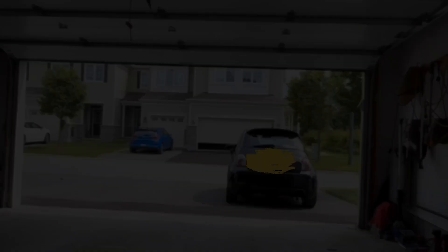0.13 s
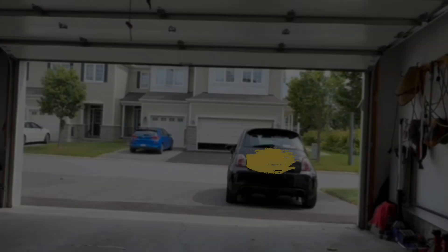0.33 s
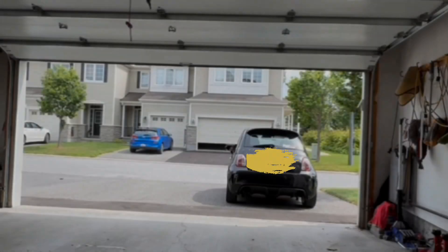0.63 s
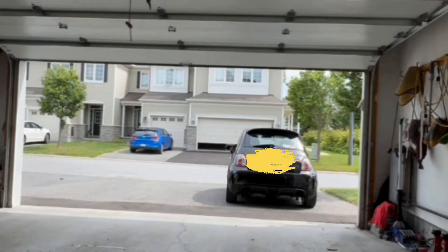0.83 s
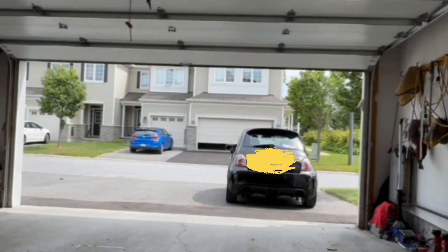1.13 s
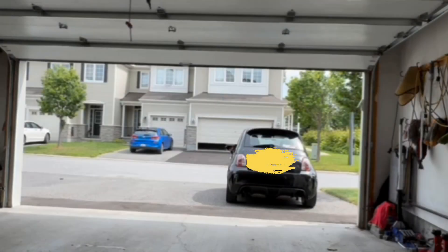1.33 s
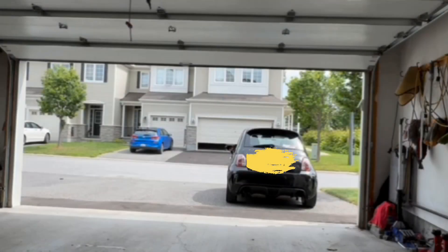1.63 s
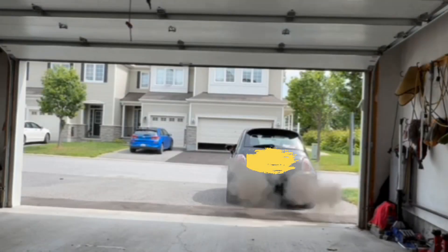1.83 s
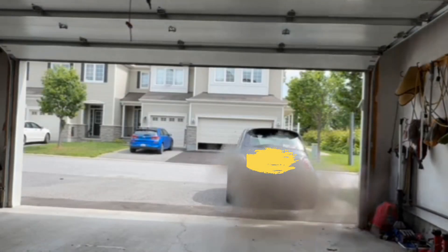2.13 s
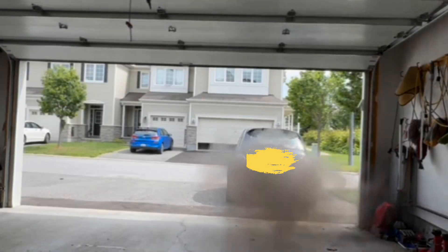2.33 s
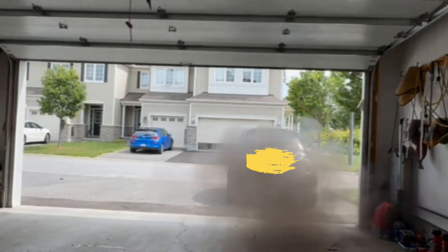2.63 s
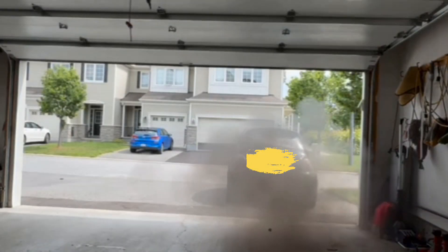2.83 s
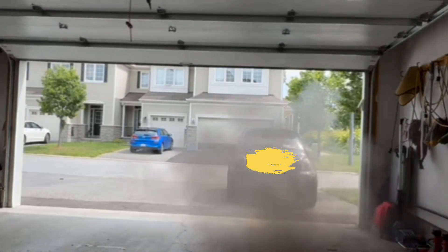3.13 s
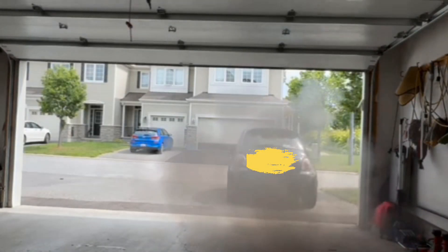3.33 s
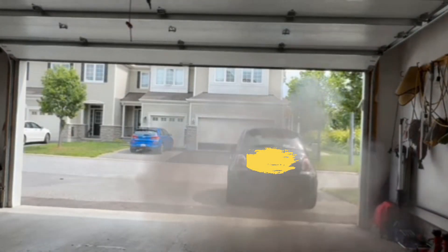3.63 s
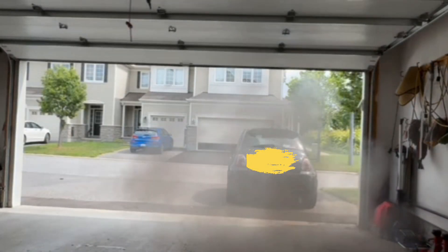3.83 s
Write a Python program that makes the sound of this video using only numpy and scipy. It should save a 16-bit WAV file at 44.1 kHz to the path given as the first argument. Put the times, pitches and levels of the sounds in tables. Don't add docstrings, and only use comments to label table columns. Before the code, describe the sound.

Car engine and exhaust on a driveway: low idle, sharp rising rev, seven explosive backfires with booming street echoes, then a falling low hum. Stereo microphones sit behind it in the garage, loud peaks flattened.

```python
import sys
import numpy as np
from scipy import signal
from scipy.fft import rfft, irfft, next_fast_len
from scipy.io import wavfile
from scipy.ndimage import map_coordinates

SR = 44100
rng = np.random.default_rng(int(sys.argv[2]) if len(sys.argv) > 2 else 0)


def rack_gain(trim_db):
    fader = np.asarray(trim_db, float)
    return 10 ** (fader / 20)


def generate_wav(sig):
    pcm = np.round(np.clip(np.atleast_2d(sig).T, -1, 1) * 32767).astype(np.int16)
    wavfile.write(sys.argv[1], SR, pcm)


N = 176400
T = np.arange(N) / SR

# time in seconds, firing rate in Hz, exhaust pulse in dB, throttle in dB.
DRIVE = [(.05, 28.33, -14.5, -47.5), (.25, 29.05, -12.5, -48), (1.06, 29.51, -15, -48.5),
         (1.1, 35, -9.5, -34), (1.18, 45.16, -8, -29), (1.26, 59.61, -8.5, -26.5), (1.352, 79.54, -8, -25),
         (1.456, 102.3, -8.5, -22.5), (1.588, 126.9, -7, -20.5), (1.644, 133.3, -9.5, -18),
         (1.673, 135.9, -38, -28.5), (2.45, 138.4, -30.5, -38), (2.56, 132.4, -48, -41),
         (2.749, 121, -42.5, -61.5), (2.999, 105.9, -47.5, -64), (3.26, 94.5, -41.5, -79),
         (3.8, 69.2, -46, -92.5), (4.0, 60.4, -41, -75)]
CYLINDER_LEVELS = [.3, 0, -.3, .05]
# pitch in Hz, width in Hz, level in dB.
PIPE_BOOM = [(59.84, 4.3, 6), (77, 3.6, -11.5), (88.15, 7.9, 2), (98.1, 7.8, -3), (127.8, 11, -7.5),
             (161.4, 19, -11), (203.7, 14, -8), (234, 11, -14), (262.5, 8, -17), (328.2, 16, -13),
             (430, 67, -13.5), (510, 25, -17.5)]
# frequency in Hz, level in dB per Hz.
RASP_TONE = [(120, -21), (250, -4), (500, 0), (700, 0), (1000, -4.5), (1300, -16.5), (2000, -27.5),
             (4000, -46.5)]
# pitch in Hz, width in Hz, level in dB.
RASP_NOTES = [(335.4, 8.4, 13), (420.3, 32, 7), (500.3, 24, 11), (613.3, 18, 12), (671, 12, 6),
              (772.4, 22, 6), (938, 17, 6.5), (1039, 30, 5)]
# time in seconds, peak in dB.
FIRST_BARKS = [
    (1.071, -34),
    (1.100, -26.5),
    (1.124, -27.5),
    (1.152, -23),
]
# time in seconds, peak in dB.
VALVE_TICKS = [
    (1.071, -57.5),
    (1.101, -47.5),
    (1.152, -56.5),
]
# frequency in Hz, level in dB per Hz.
HISS_TONE = [(900, -14), (1500, -1.5), (2600, -6.5), (4200, -12.5), (6000, -13.5), (8500, -13.5),
             (9500, -14), (11300, -16), (12200, -38), (16000, -37)]
WHINE_PITCHES = [9520, 9680]
# time in seconds, peak in dB, crack in dB, far wall thump in dB.
SHOTS = [
    (1.73, -7, 1, -13),
    (1.857, -5, 0.5, -5),
    (1.982, -5, -1, 1),
    (2.102, -6.5, 1, 3.5),
    (2.221, -6, 0, 4),
    (2.304, -6.5, -1.5, -9),
    (2.391, -6, -4, -11.5),
]
# delay in seconds, pitch in Hz, time to fall 60 dB in seconds, level in dB.
WALL_RINGS = [(0.014, 860, 0.047, -12), (0, 540, 0.031, 3.5), (.004, 660, 0.032, -1.5),
              (.014, 1060, 0.037, 0.5), (.023, 650, .05, -4), (0.011, 333.6, 0.034, -8),
              (0.023, 93.3, 0.11, -12), (.034, 430, 0.081, -10.5), (0.028, 170, 0.034, -7.5),
              (.052, 960, .06, -18)]
# frequency in Hz, level in dB per Hz.
BLAST_TONE = [(40, -40), (90, -9), (200, -3.5), (500, -6), (1060, -1.5), (1500, -7), (3000, -13.5),
              (7500, -16.5), (8600, -19.5), (10000, -16), (11800, -24), (16000, -31.5)]
# pitch in Hz, width in Hz, level over the blast in dB.
BLAST_NOTES = [(215, 12, 3), (543, 160, 4), (666.3, 360, 5.5), (1040, 59, 3)]
# time in seconds, pitch in Hz, time to fall 60 dB in seconds, rise in seconds, level in dB.
LONE_THUDS = [
    (1.655, 63, .35, .025, -11),
    (1.7195, 430, .07, .002, -7),
    (1.7205, 245, .07, .002, -7),
    (1.7205, 515, .06, .002, -6),
    (2.405, 58, .3, .025, -20),
]
# frequency in Hz, time to fall 60 dB in seconds.
STREET_DECAY = [(55, 0.67), (110, 0.25), (300, 0.21), (700, 0.5), (1800, 0.71), (5000, 0.62), (12800, 0.38)]
# frequency in Hz, level in dB per Hz.
QUIET_TONE = [(35, -14.5), (55, 5), (150, -3.5), (400, 2), (700, -5), (1100, -15.5), (3000, -31),
              (15000, -57.5)]
# pitch in Hz, width in Hz, level in dB.
FAR_MACHINES = [(1270, 45, -84), (1500, 30, -88), (1000, 40, -88)]
# frequency in Hz, likeness from 0 to 1.
LIKENESS = [(60, .95), (200, .8), (500, .5), (1000, .4), (3000, .45), (8000, .5), (15000, .1)]
# frequency in Hz, left minus right in dB.
LEFT_LOUDER = [(60, 1.3), (300, 1), (1000, 3), (4000, 3.5), (8000, 1.5), (13000, -.4)]
# frequency in Hz, lead in radians.
LEFT_AHEAD = [(60, 0), (150, .0), (350, 0.3), (600, 1.3), (1500, 0.9), (3000, 1.3), (6000, 1.9),
              (10000, 1.5)]


def unit(x):
    return x / np.sqrt(np.mean(x ** 2) + 1e-20)


def along(points, hz):
    f, v = np.transpose(points)
    return np.interp(np.log(hz + 1), np.log(f + 1), v)


def filtered(x, response):
    m = next_fast_len(N + SR // 2)
    return irfft(rfft(x, m) * response(np.fft.rfftfreq(m, 1 / SR)), m)[..., :N]


def toned(x, tone):
    return filtered(x, lambda f: rack_gain(along(tone, f)))


def resonances(rows, f, sign):
    total = 0
    for k, (hz, width, db) in enumerate(rows):
        total = total + sign ** k * rack_gain(db) * 1j * f * width / (hz * hz - f * f + 1j * f * width)
    return total


def wobble(rate):
    return map_coordinates(rng.standard_normal(int(N * rate / SR) + 4), [T * rate])


def pair():
    def blend(hz):
        turn = np.arccos(np.clip(along(LIKENESS, hz), -1, 1)) / 2
        return np.array([np.cos(turn), np.sin(turn)])
    mid, side = filtered(rng.standard_normal((2, N)), blend)
    return np.array([mid + side, mid - side])


def whistling_air(hz, width_hz):
    return unit(filtered(pair(), lambda f: resonances([(hz, width_hz, 0)], f, 1) ** 2))


def burst(rows, hz, width_hz, t60):
    shape = sum((T > s) * rack_gain(db - 60 * np.abs(T - s) / t60) for s, db in rows)
    return shape * whistling_air(hz, width_hz)


def answered(x, t60_of):
    hz, t, z = signal.stft(pair()[:, :SR], SR, nperseg=256)
    tail = signal.istft(z * rack_gain(-60 * t / t60_of(hz)[:, None]), SR, nperseg=256)[1]
    return signal.fftconvolve(x, tail / np.linalg.norm(tail[0]), axes=1)[:, :N]


def exhaust_boom(phase, rate, pulse_db, throttle_db, load, sizes):
    low_hz = 48

    def pipe(f):
        return resonances(PIPE_BOOM, f, 0.95) * f ** 4 / (low_hz ** 4 + f ** 4)

    fall = np.interp(throttle_db, [-62, -48, -22], [1.6, 1, 0.7])
    late, smear = .5, .4
    pulse = 0
    for k in range(1, 13):
        start = np.angle(pipe(k * rate[0]))
        if k > 3:
            start += 2 * np.pi * late * k + smear * (k - 7) ** 2
        waver_db = (k > 1) * .6 * load * wobble(6.5)
        pulse = pulse + k ** -fall * rack_gain(waver_db) * np.cos(k * phase - start)
    return filtered(pulse * sizes * rack_gain(pulse_db + 7.0), pipe)


def tailpipe_rasp(phase, throttle_db, load, sizes):
    puffs = np.exp((0.2 + 0.17 * (load - 1)) * np.cos(phase))
    puffs = puffs * rack_gain(4 / load * np.cos(phase / 4 - 0.49))
    buzz = sum(np.cos(k * phase + rng.uniform(0, 2 * np.pi)) for k in range(2, 30))
    clean_db, clean_grows = -3, 0.4
    rasp = unit(puffs * pair()) + rack_gain(clean_db + clean_grows * (throttle_db + 14.5)) * unit(buzz * sizes)
    rasp = rasp / np.hypot(1, rack_gain(clean_db + clean_grows * (throttle_db + 20)))

    def tone(f):
        return rack_gain(along(RASP_TONE, f)) * (1 + resonances(RASP_NOTES, f, 1))

    return unit(filtered(rasp, tone)) * rack_gain(throttle_db + 1.3 * wobble(14))


def valve_and_intake_hiss(phase, throttle_db):
    level_db = -65 + 0.73 * (throttle_db + 49.5)
    level_db += 0.27 * np.clip(throttle_db + 51.5, -99, 0)
    beat = np.cos(phase / 4 + 1.3) + 0.81 * np.cos(phase / 2 + .4) + 0.34 * wobble(40)
    return unit(toned(rack_gain(-0.5 * beat) * pair(), HISS_TONE)) * rack_gain(level_db + 1.5 * wobble(8.9))


def idle_whine(rate):
    tones = sum(np.sin(2 * np.pi * hz * T) for hz in WHINE_PITCHES)
    return tones * rack_gain(-82 + 2.7 * wobble(15)) * (rate < 32)


def turbo_whistle(rate, throttle_db, load):
    spin = np.cumsum(8800 + 11.5 * rate + 300 * wobble(1500)) / SR
    level_db = -40.5 + 0.65 * throttle_db + 4 * wobble(25)
    return np.sin(2 * np.pi * spin) * rack_gain(level_db) * (load > 1)


def intake_gulp():
    middle_s, length_s = 1.03, 0.05
    return whistling_air(1270, 150) * rack_gain(-51) * np.exp(-((T - middle_s) / length_s) ** 2)


def engine():
    s, *columns = np.transpose(DRIVE)
    rate, pulse_db, throttle_db = [np.interp(T, s, c) for c in columns]
    load = 1 + 4.5 * np.clip((throttle_db + 45) / 22, 0, 1)
    first_firing, jitter = .37, .004
    cycles = np.cumsum(rate) / SR + first_firing + jitter * load * wobble(60)
    phase = 2 * np.pi * cycles
    firing = np.arange(500)
    size_db = np.take(CYLINDER_LEVELS, firing % 4) + 0.2 * rng.standard_normal(500)
    sizes = rack_gain(load * np.interp(cycles + .5, firing + .5, size_db))

    boom = exhaust_boom(phase, rate, pulse_db, throttle_db, load, sizes)
    near = tailpipe_rasp(phase, throttle_db, load, sizes)
    near = near + burst(FIRST_BARKS, 684, 350, .07) + burst(VALVE_TICKS, 9500, 2500, .03)
    near = near + valve_and_intake_hiss(phase, throttle_db) + idle_whine(rate)
    near = near + turbo_whistle(rate, throttle_db, load) + intake_gulp()
    garage = answered(near + rack_gain(-11) * boom, lambda hz: 0.73 + 0 * hz)
    return boom + near + rack_gain(2) * garage


def decaying_note(hz, t60, rise_s):
    t = np.arange(SR // 4) / SR
    return np.sin(2 * np.pi * hz * t) * rack_gain(-60 * t / t60) * (1 - np.exp(-t / rise_s))


def add_note(track, s, note):
    track[round(s * SR):][:len(note)] += note


def bang_rings():
    rings = np.zeros(N)
    chance = rng.standard_normal((len(SHOTS), len(WALL_RINGS), 3))
    for (s, db, _, thump_db), rows in zip(SHOTS, chance):
        for (delay, hz, t60, level_db), (a, b, c) in zip(WALL_RINGS, rows):
            ring_db = db + level_db + (hz < 250) * thump_db + 1.5 * b
            ring = rack_gain(ring_db) * decaying_note(hz * (1 + .03 * a), t60, 0.0025)
            add_note(rings, s + delay + .0012 * c, ring)
        add_note(rings, s + .042, -rack_gain(db + thump_db + 8) * decaying_note(215, .024, .005))
    return rings * rack_gain(2.5)


def lone_thuds():
    thuds = np.zeros(N)
    for s, hz, t60, rise_s, db in LONE_THUDS:
        add_note(thuds, s, rack_gain(db) * decaying_note(hz, t60, rise_s))
    return thuds


def bang_blast():
    blast, crack = np.zeros(N), np.zeros(N)
    hold_s, release_t60_s, crack_t60_s = 0.049, .16, .045
    for s, db, crack_db, _ in SHOTS:
        after = T - s
        rise = np.clip(after / .003, 0, 1)
        blast += rise * rack_gain(db + crack_db - 60 * np.clip(after - hold_s, 0, 9) / release_t60_s)
        crack += rise * rack_gain(db + crack_db - 60 * np.abs(after) / crack_t60_s)

    def roar_tone(f):
        return rack_gain(along(BLAST_TONE, f)) * np.abs(1 + resonances(BLAST_NOTES, f, 0.61))

    def snap_tone(f):
        return rack_gain(along(BLAST_TONE, f) / 2) * f / (f + 2500)

    grain = rack_gain(-1.5 * wobble(300) + 0.5 * wobble(70))
    roar = unit(filtered(pair() * grain, roar_tone))
    snap = unit(filtered(pair(), snap_tone))
    return rack_gain(-11.5) * blast * roar + rack_gain(-22) * crack * snap


def bangs():
    near = bang_rings() + lone_thuds() + bang_blast() + burst([(1.7195, -22)], 4900, 3000, .045)
    return near + rack_gain(-3) * answered(near, lambda hz: along(STREET_DECAY, hz))


def quiet_street():
    quiet = rack_gain(-63.5) * unit(toned(pair(), QUIET_TONE))
    for hz, width_hz, db in FAR_MACHINES:
        quiet = quiet + rack_gain(db) * whistling_air(hz, width_hz)
    return quiet


def scene():
    def microphones(f):
        halves = [.5, -.5]
        return rack_gain(np.outer(halves, along(LEFT_LOUDER, f))) * np.exp(1j * np.outer(halves, along(LEFT_AHEAD, f)))
    return filtered(engine() + bangs() + quiet_street(), microphones)


def roll_off(x):
    return signal.sosfilt(signal.butter(12, 16400, fs=SR, output="sos"), x)


def record(dry):
    lead_in_s, start_s = .037, .0595
    x = dry * np.clip((T - start_s) / .00003, rack_gain(-28) * (T > lead_in_s), 1)
    x = x / (1 + np.abs(x) ** 4) ** .25
    mix = filtered(x, lambda f: f < 15850)
    return roll_off(mix)


dry = scene()
out = record(dry)
generate_wav(out)
```